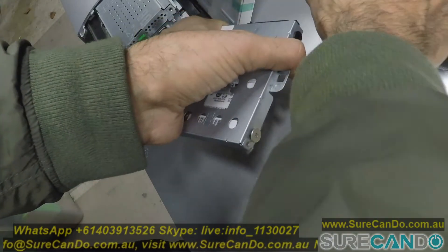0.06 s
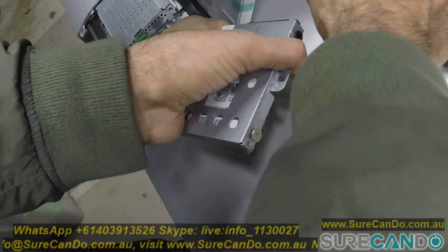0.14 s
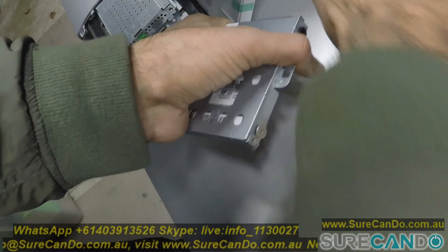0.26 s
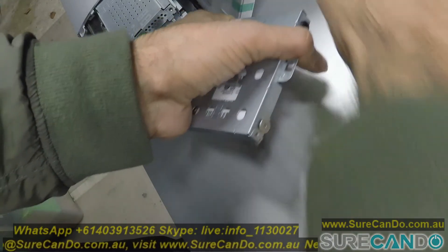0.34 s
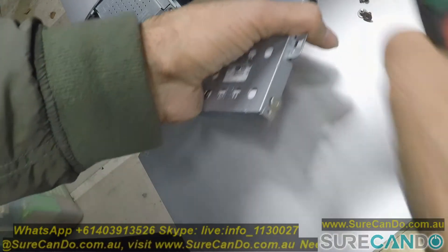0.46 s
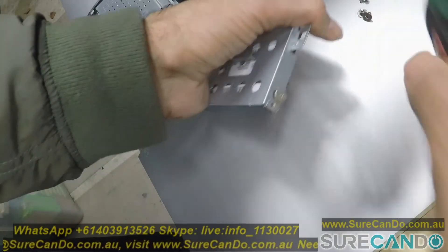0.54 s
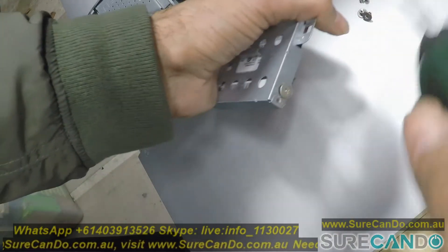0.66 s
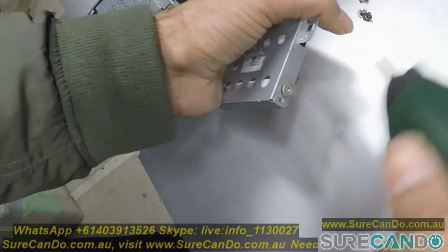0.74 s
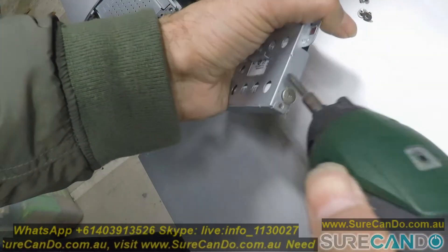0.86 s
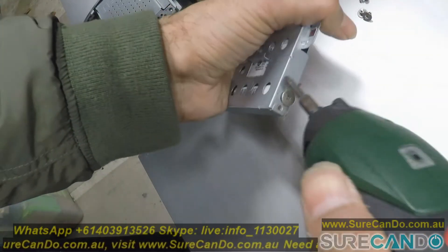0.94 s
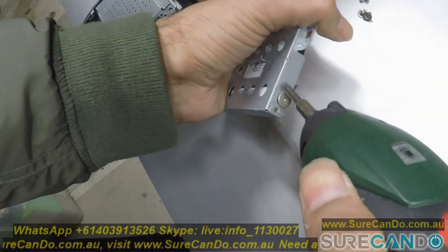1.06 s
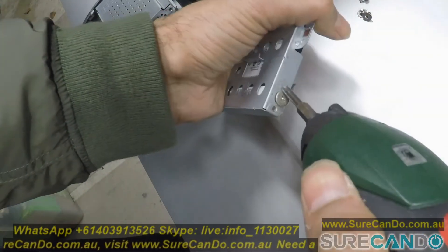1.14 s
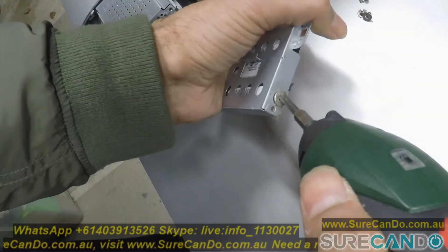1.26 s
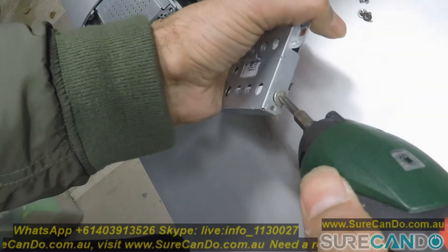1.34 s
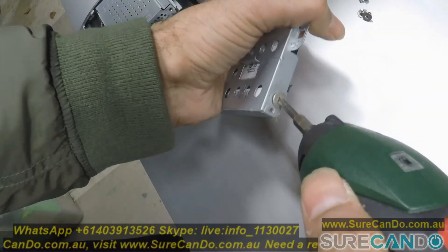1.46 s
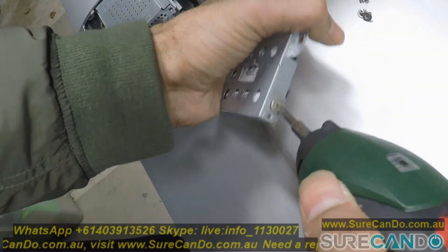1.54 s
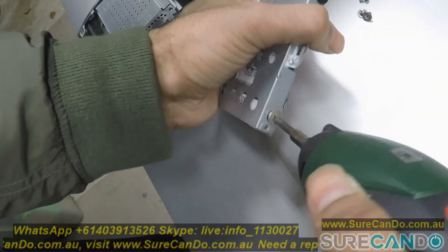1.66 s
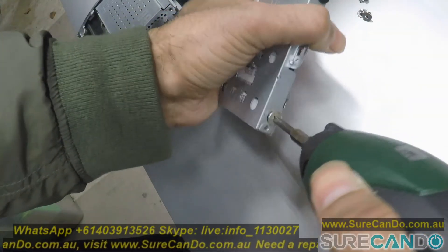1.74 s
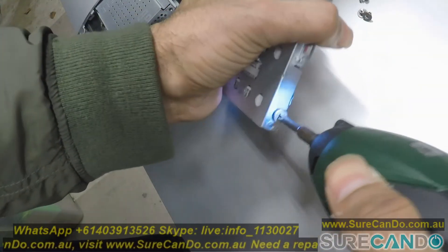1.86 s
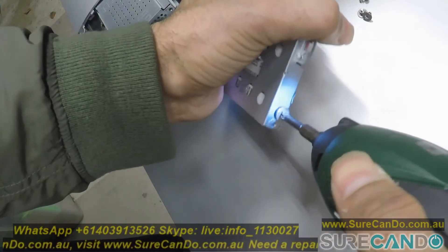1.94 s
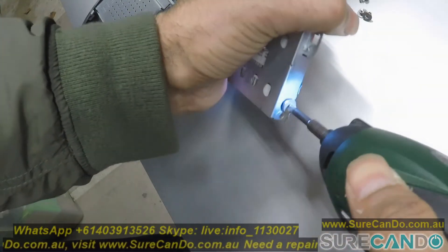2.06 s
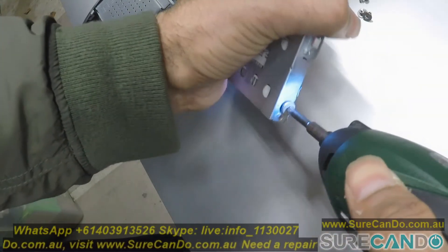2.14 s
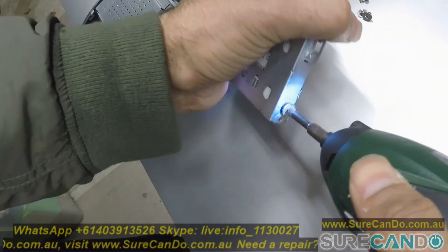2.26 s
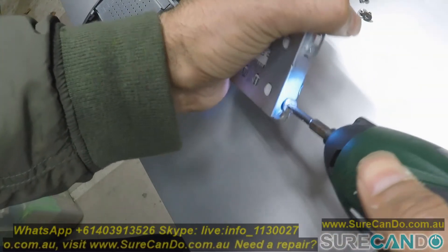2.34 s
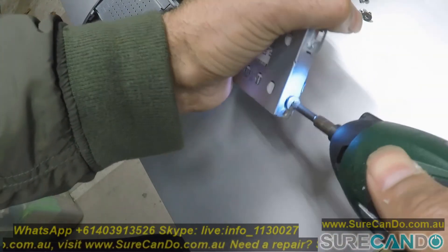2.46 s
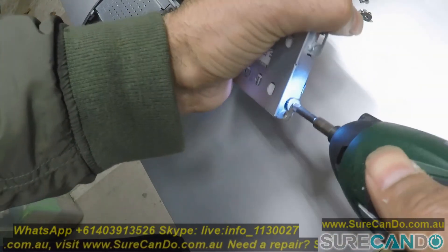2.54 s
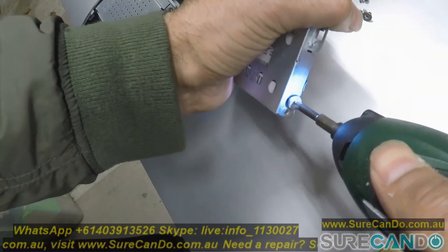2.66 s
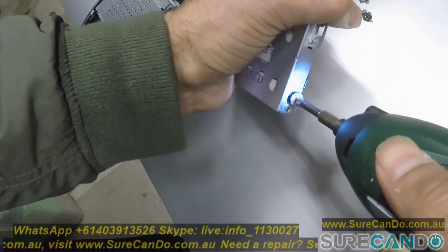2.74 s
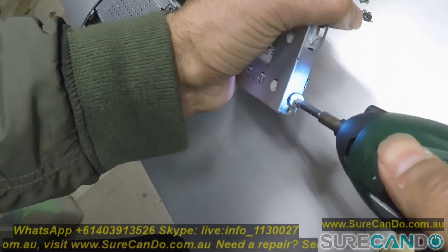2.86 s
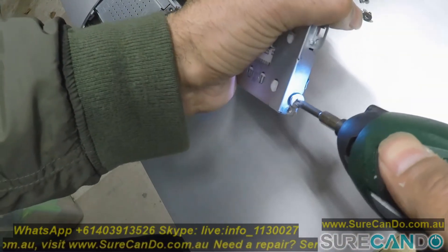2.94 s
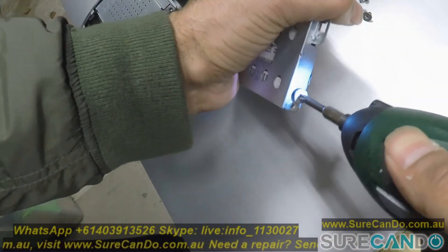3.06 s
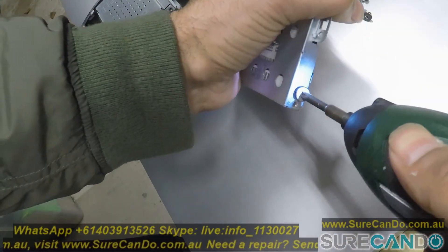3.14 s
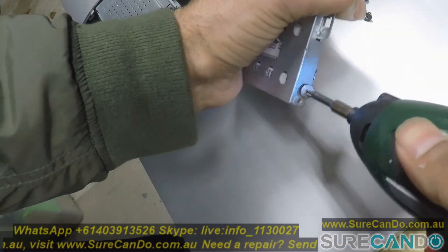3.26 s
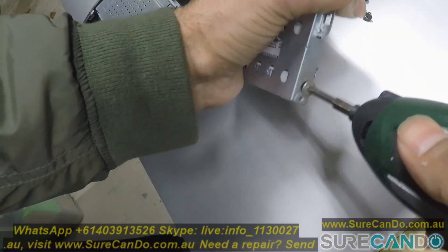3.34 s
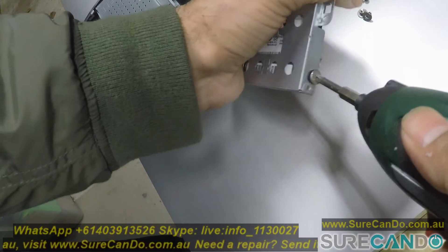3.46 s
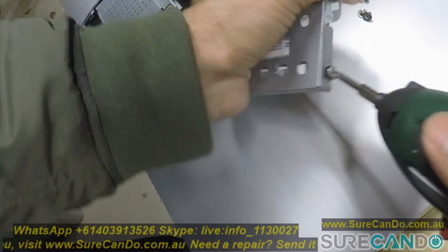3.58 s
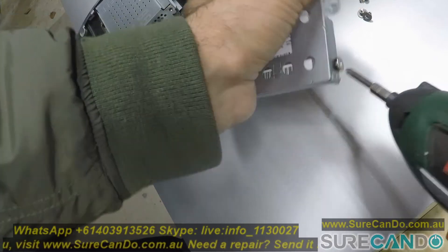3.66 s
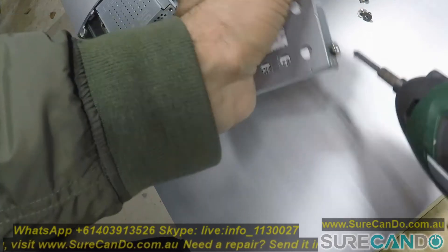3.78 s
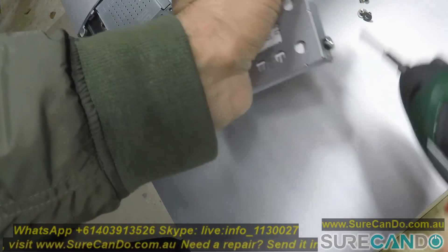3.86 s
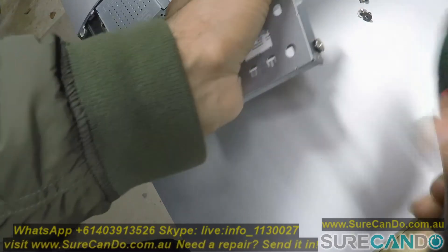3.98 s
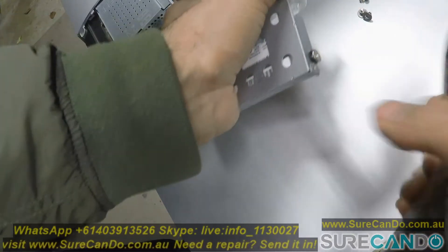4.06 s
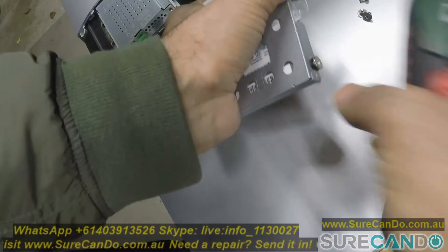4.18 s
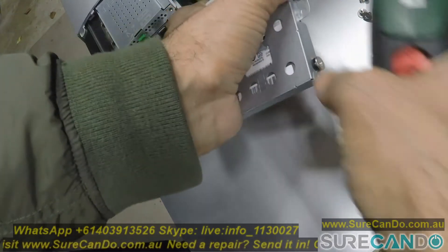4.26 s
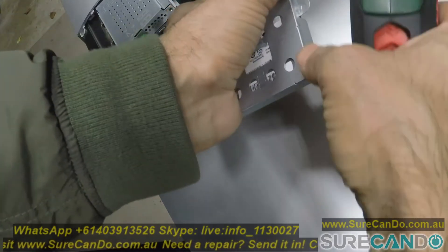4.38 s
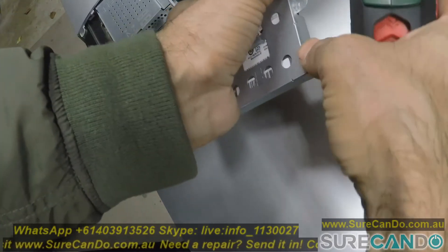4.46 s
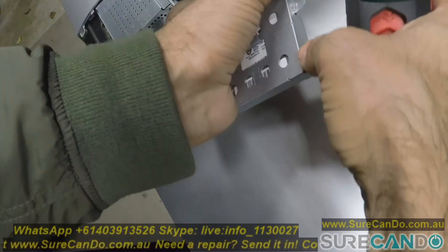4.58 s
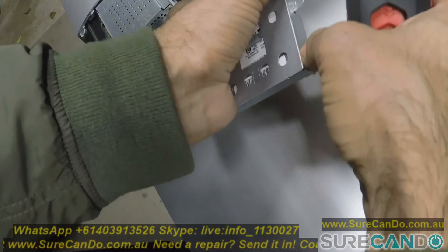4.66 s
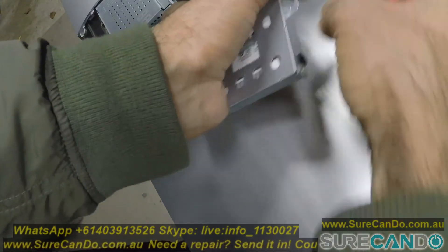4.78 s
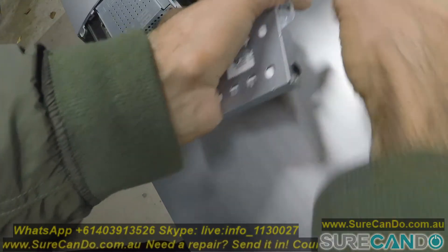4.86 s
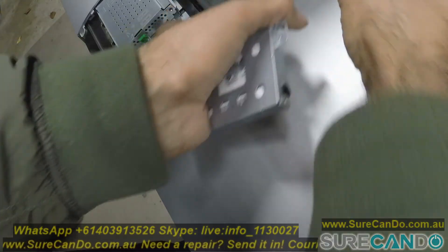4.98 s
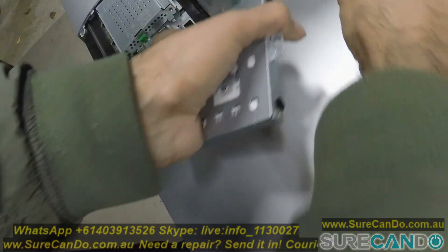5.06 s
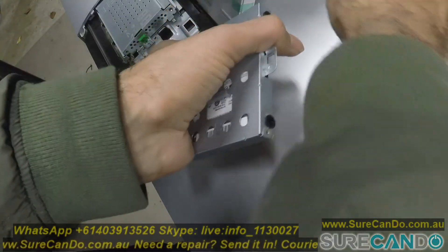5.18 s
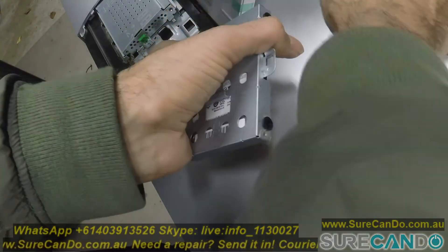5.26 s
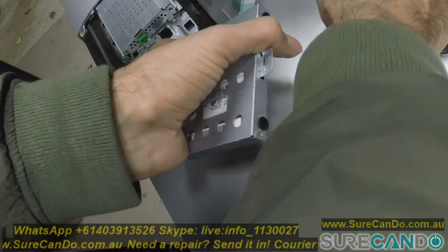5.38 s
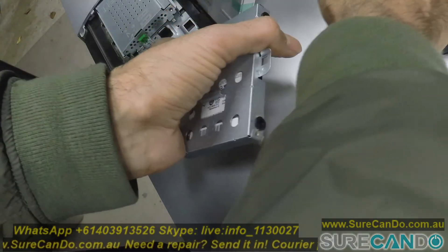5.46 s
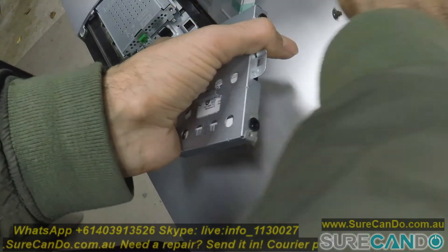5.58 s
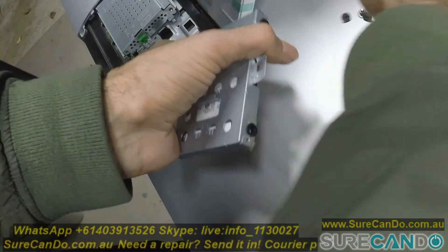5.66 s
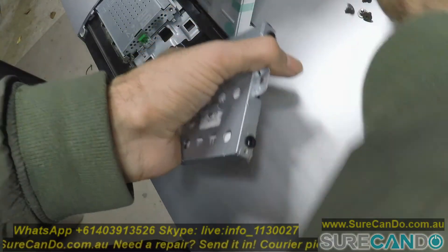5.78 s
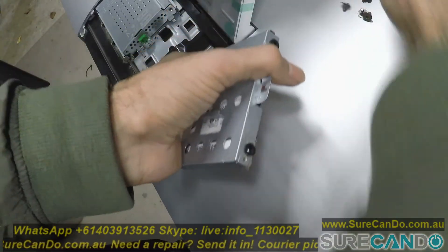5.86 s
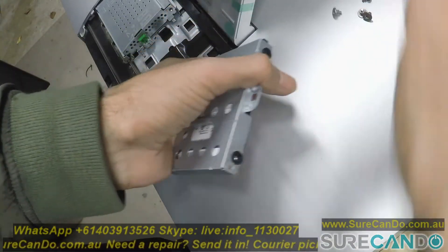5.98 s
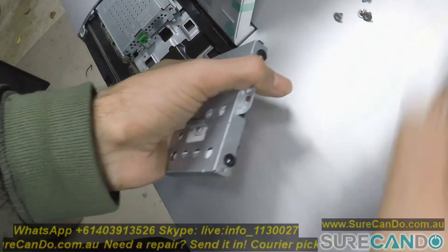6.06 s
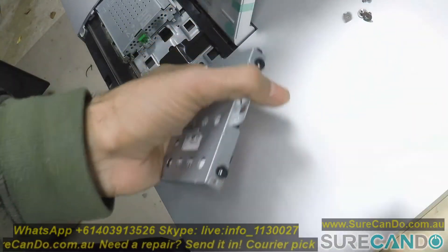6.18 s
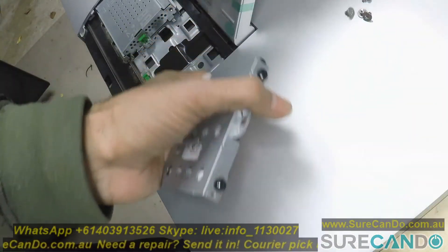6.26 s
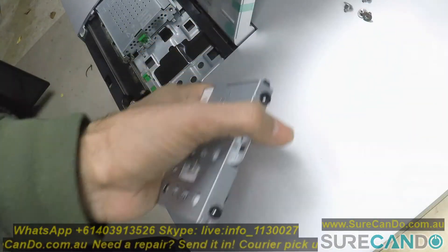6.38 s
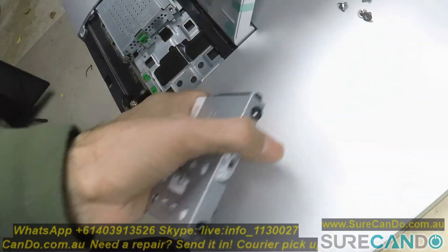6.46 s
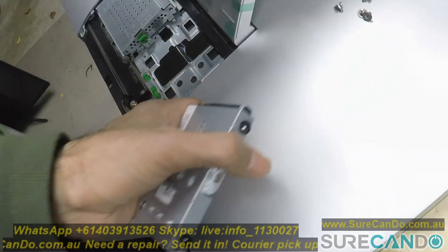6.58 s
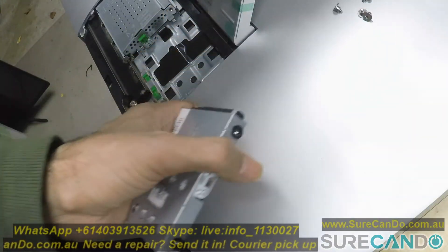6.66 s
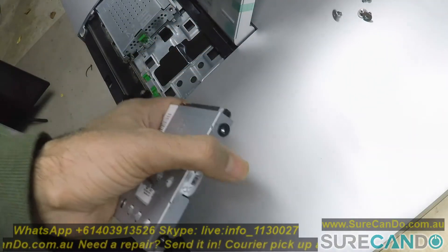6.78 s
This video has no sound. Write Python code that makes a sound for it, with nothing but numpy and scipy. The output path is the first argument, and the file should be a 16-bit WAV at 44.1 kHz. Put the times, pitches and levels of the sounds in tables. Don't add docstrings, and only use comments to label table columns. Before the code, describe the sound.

Close up, a small electric screwdriver buzzes for under two seconds amid sleeve rustle, bit clicks, dull knocks and a clattering dropped piece.

```python
import sys
import numpy as np
from scipy import signal
from scipy.fft import rfft, irfft
from scipy.io import wavfile
from scipy.ndimage import uniform_filter1d

SR = 44100
rng = np.random.default_rng(int(sys.argv[2]) if len(sys.argv) > 2 else 0)


def rack_gain(trim_db):
    fader = np.asarray(trim_db, float)
    return 10 ** (fader / 20)


def wrap_up_sound(samples):
    columns = np.atleast_2d(samples).T
    tamed = np.clip(columns, -1, 1)
    steps = np.round(tamed * 32767).astype(np.int16)
    wavfile.write(sys.argv[1], SR, steps)


N = 300762
T = np.arange(N) / SR
F = np.maximum(np.arange(N // 2 + 1) * SR / N, 1.)

POWER_ON_S, POWER_OFF_S = 1.858, 3.27
FREE_HZ = 292.3
PLANET_RATIO = .5925


def unit(x):
    return x / np.sqrt(np.mean(x ** 2))


def curve(rows):
    time_s, level_db = np.transpose(rows)
    return np.interp(T, time_s, level_db)


def colour(x, points, lo_hz=0.88, hi_hz=3e4):
    hz, db = np.transpose(points)
    edges = 1 / np.sqrt((1 + (lo_hz / F) ** 8) * (1 + (F / hi_hz) ** 8))
    gain = rack_gain(np.interp(np.log(F), np.log(hz), db))
    return unit(irfft(rfft(x) * gain * edges, N))


def band(x, lo_hz, hi_hz):
    return signal.sosfilt(signal.butter(4, [lo_hz, hi_hz], "bandpass", fs=SR, output="sos"), x)


def ring(x, hz, t60_s):
    r = np.exp(-np.log(1000) / (t60_s * SR))
    return signal.lfilter([1 - r * r, 0, r * r - 1], [2, -4 * r * np.cos(2 * np.pi * hz / SR), 2 * r * r], x)


def walk(rate_hz):
    k = int(SR / rate_hz)
    steps = np.repeat(rng.standard_normal(N // k + 1), k)
    return unit(uniform_filter1d(uniform_filter1d(steps, k), k)[:N])


def patchy(x, depth_db):
    z = signal.stft(x, nperseg=512, noverlap=384)[2]
    gain = uniform_filter1d(rng.standard_normal(z.shape), size=2, axis=0)
    gain = uniform_filter1d(gain, size=12, axis=1)
    streaked = signal.istft(z * rack_gain(depth_db * gain / gain.std()), nperseg=512, noverlap=384)[1][:N]
    return unit(streaked) * x.std()


def swells(start_s, hold_s, db, rise_s, fade_s, floor_db):
    t = T[::64, None]
    before = (start_s - t) / np.clip(rise_s, .004, .6)
    after = (t - start_s - hold_s) / np.clip(fade_s, .03, .6)
    away = np.maximum(before, after).clip(0)
    gain = np.sqrt(rack_gain(floor_db) ** 2 + np.sum(rack_gain(db - 20 * away) ** 2, axis=1))
    return np.interp(T, t[:, 0], gain)


def building():
    # (time [s], hold [s], deep level [dB], thump level [dB])
    bumps = [(0.023, 0.105, -55.5, -64.5), (0.305, 0.12, -52, -57), (0.625, 0.092, -54.5, -67),
             (0.801, 0.18, -65, -68), (1.118, 0.03, -63, -67), (1.33, 0.004, -55, -63.5),
             (1.518, 0.0132, -55, -79), (1.74, 0.095, -54, -64.5), (1.983, 0.024, -46, -63),
             (2.09, 0.058, -43.5, -58), (2.262, 0.099, -58, -62), (2.505, 0.24, -49, -61.5),
             (2.745, 0.18, -52, -63), (3.024, 0.2, -45, -57.5), (3.305, 0.34, -46.5, -62.5),
             (3.61, 0.081, -47, -42.5), (3.764, 0.093, -41, -69), (3.927, 0.078, -41.5, -78),
             (4.07, 0.16, -53, -73), (4.29, 0.0058, -40.5, -63), (4.406, 0.24, -49.5, -77),
             (4.75, 0.118, -49, -90), (4.874, 0.01, -42, -56), (5.206, 0.0066, -54, -49.5),
             (5.293, 0.0018, -39, -40), (5.381, 0.076, -44.5, -43), (5.596, 0.0058, -43, -64),
             (5.762, 0.188, -46.5, -74), (6.047, 0.07, -42, -72), (6.513, 0.29, -50.5, -76)]
    # (frequency [Hz], level [dB per Hz])
    deep_colour = [(8.8, -41.5), (15, 2.5), (59, 3), (74, 0.5), (91, -13.5), (130, -15), (170, -24.5),
                   (290, -120)]
    # (time [s], level [dB])
    drone_level = [(0, -55), (.3, -64), (.6, -66.5), (1.0, -76.5), (1.7, -79.5), (1.9, -61.5), (3.5, -65),
                   (3.7, -58.5), (3.95, -73.5), (4.7, -95), (4.9, -64.5), (5.3, -69.5), (5.45, -56.5),
                   (5.7, -61.5), (6.1, -68), (6.5, -63), (6.82, -75)]
    # (frequency [Hz], level [dB])
    fan_tones = [(1050, -86.5), (1105, -82)]
    rise_s, fade_s = 0.035, 0.1673

    air = rng.standard_normal(N)
    s, hold_s, deep_db, thump_db = np.transpose(bumps)
    rumble = unit(1.2 * colour(air, deep_colour, hi_hz=118) + 0.42 * unit(ring(air, 66, 1.0)))
    deep = swells(s, hold_s, deep_db, rise_s, fade_s, -62.5) * rumble
    thump = swells(s, hold_s, thump_db, rise_s / 2, fade_s * 0.37, -77) * rack_gain(2.0 * walk(24))
    thump *= unit(band(rng.standard_normal(N), 85, 220))
    drone = rack_gain(curve(drone_level) + 0.93 * walk(23)) * unit(band(rng.standard_normal(N), 240.6, 340))
    fan = sum(rack_gain(db + walk(5)) * np.sin(2 * np.pi * hz * T + .8 * walk(25)) for hz, db in fan_tones)
    return deep + thump + drone + fan


def rustle():
    # (fullest [s], hold [s], level [dB], rise [s per 20 dB], fade [s per 20 dB])
    slides = [(0, 0.02, -42.5, 0.1, 0.1), (0.156, 0.044, -46, 0.3, 0.1), (0.369, 0.16, -53.5, 0, -1.8),
              (0.57, 0.22, -58.5, 2.5, -0.4), (0.829, 0.086, -66.5, -4, 0), (3.684, 0.04, -50, 1.5, 0.13),
              (4.035, 0.24, -57.5, -0.3, -0.1), (4.299, 0.077, -58.5, .05, -0.3),
              (4.439, 0.055, -64, 0.9, .1), (4.567, 0.035, -74, -2, 0.3), (4.895, 0.24, -52.5, 0.1, 0.2),
              (5.248, 0.067, -69, 1.3, .2), (5.585, 0.071, -44.5, 0, 0.6), (5.85, 0.055, -50.5, -0.7, 0),
              (6.049, 0.098, -48.5, 0, 0.5), (6.316, 0.073, -51.5, 0.2, -0.5),
              (6.418, 0.094, -46, 0.056, 0.2), (6.607, 0.06, -53.5, .1, 0), (6.75, 0.053, -46.5, -0.16, 2)]
    # (fullest [s], hold [s], level [dB], fade [s per 20 dB], brightness [dB per range])
    swishes = [(-0.003, 0.012, -53, 0.2, 10), (0.303, 0.021, -64.5, 0.2, 7),
               (0.471, 0.033, -63.5, 0.4, 12.5), (3.781, 0.003, -54.5, 0, 8), (3.83, 0.086, -60.5, 0.7, 4),
               (3.963, 0.062, -58, 0.34, 8.5), (4.422, 0.29, -79, -4.5, -15), (4.888, 0.11, -48, 0.26, 8.5),
               (5.544, 0.11, -58.5, 0.1, -13), (5.86, 0.03, -61, 0.8, 3), (5.967, 0.096, -58, 5, 5.5),
               (6.085, 0.076, -51.5, 0.34, 9), (6.29, 0.065, -48, 0.1, 1), (6.44, 0.099, -53.5, 0.4, 0),
               (6.54, 0.019, -46, 0.18, 7.5)]
    # (fullest [s], hold [s], level [dB], fade [s per 20 dB], brightness [dB per range])
    tugs = [
        (.154, 0.01, -47, 0.13, 1),
        (.36, 0.07, -66, 0.18, -2),
        (.575, 0.053, -60.5, 0.18, 2),
        (4.019, 0.027, -58, 0.15, 7),
        (4.825, 0.034, -56, 0.082, -4),
        (5.775, 0.048, -62.5, 0.14, 0.5),
        (6.756, .07, -43, .1, 5.5),
    ]
    # (fullest [s], hold [s], level [dB], fade [s per 20 dB])
    sheen = [
        (3.72, .04, -69, 0.3),
        (4.0, .05, -74, .15),
        (4.95, .08, -68.5, .3),
        (5.856, 0.027, -79, -1),
        (6.06, 0.094, -64, 0),
        (6.413, 0.12, -66, -2),
        (6.547, 0.032, -73, -0.2),
        (6.776, .06, -59, .1),
    ]
    # (time [s], bench mode gain [dB])
    drag = [
        (0, 2),
        (.3, 10),
        (.9, 18),
        (3.9, 11.5),
        (4.06, 17),
        (4.6, 21),
        (4.8, 0.5),
        (5.3, 6.5),
        (5.6, 5.5),
        (6.82, 3.5),
    ]
    # (frequency [Hz], width [Hz], level [dB])
    bench = [(510, 45, 3.5), (1640, 680, -20.5), (1980, 68, -7.5), (2250, 56, -6.5), (2560, 54, -15)]
    # (frequency [Hz], level [dB per Hz])
    cloth = [(120, -43.5), (200, 3.5), (448, 4.5), (491, -2), (612, 1.5), (883, 2), (1040, -7.5),
             (1350, -7.5), (1650, -9.5), (3000, -11), (4270, -17.5), (5130, -22.5), (7970, -18.5),
             (16000, -50)]
    still_db = (-80.5, -82, -110, -103)
    edges_hz = ((360, 1300), (1300, 4700), (4700, 9700), (9700, 3e4))
    swish_rise_s, tug_rise_s = 0.083, 0.0086

    gains = [swells(*np.transpose(slides), still_db[0])]
    s, hold_s, db, fade_s, bright_db = np.transpose(list(swishes) + list(tugs))
    rise_s = np.repeat([swish_rise_s, tug_rise_s], [len(swishes), len(tugs)])
    for k, range_db in enumerate((-0.5, -14, -45)):
        quicker = 0.48 ** k
        level_db = db + range_db + k * bright_db
        gains.append(swells(s, hold_s, level_db, rise_s * quicker, fade_s * quicker, still_db[k + 1]))
    s, hold_s, db, fade_s = np.transpose(sheen)
    gains[-1] = gains[-1] + swells(s, hold_s, db, tug_rise_s * 2, fade_s, -120)

    rub = rack_gain(1.3 * walk(400) + .4 * walk(60)) * rng.standard_normal(N)
    modes = sum(rack_gain(db + 2.5 * walk(20)) * ring(rub, hz, 2.2 / width_hz) for hz, width_hz, db in bench)
    rub = patchy(rub + rack_gain(curve(drag)) * modes, 3.2)
    return sum(gain * rack_gain(0.8 * walk(40)) * colour(rub, cloth, lo_hz, hi_hz)
               for gain, (lo_hz, hi_hz) in zip(gains, edges_hz))


def taps(events, t60_s, sheet_share, ring_share, thud_hz, body_hz, tick_hz, air_share, rise_s, mid_hz, steel_share):
    # (frequency [Hz], level [dB], t60 [s])
    bracket = [(1840, -10.5, 0.085), (2374, -47, 0.52), (2590, 1, 0.025), (2980, -17.5, 0.2),
               (3400, -11, 0.13), (5206, 5.5, 0.034), (6600, 13, 0.031), (7122, -6, 0.14)]

    def peak(v):
        match = np.sqrt(np.sum(v[0] ** 2) / np.sum(v[1] ** 2))
        return v / np.abs(v[0]).max() * np.array([[1], [match]])

    out, t = np.zeros((2, N + SR)), T[:SR // 6]
    for s, db, hz, thud_db, tick_db in events:
        shape = rack_gain(-60 * t / np.clip(t60_s, .004, .2)) * np.clip(t / rise_s, 0, 1) ** 2
        burst = np.array([rng.standard_normal(len(t)) * shape, 0 * t])
        burst[:, int(rise_s * SR)] -= 7
        mid = peak(band(burst, body_hz, mid_hz))
        mid = mid + ring_share * np.array([[1], [.6]]) * peak(ring(burst, hz, 0.03))
        sheet = peak(sum(rack_gain(g) * ring(burst, f, min(d, .025)) for f, g, d in bracket))
        thud = peak(band(burst, thud_hz, body_hz))
        tick = band(burst, 5000, tick_hz) + air_share * band(burst, tick_hz, 20000)
        tick = peak(tick + steel_share * 4 * ring(burst, 6560, .0075))
        hit = mid + sheet_share * sheet + rack_gain(thud_db) * thud + rack_gain(tick_db + 4.0) * tick
        out[:, int((s - rise_s / 2) * SR):][:, :len(t)] += rack_gain(db - 2.0) * hit
    return out[:, :N]


def handling():
    # (time [s], peak level [dB], ring [Hz], thud level [dB], tick level [dB])
    events = [(0.1392, -35.5, 2140, -13.5, -30), (0.156, -35.5, 2140, -11, -11),
              (0.171, -38, 2240, 2, -26.5), (0.2026, -29, 1890, -9, -30.5), (0.4213, -50, 2610, -9, -30),
              (0.5796, -29, 1640, -8, -30), (4.0193, -25, 2150, -9.5, -37), (4.0632, -41, 2170, -22, -7),
              (5.7084, -53.5, 1100, 6, -40), (5.7784, -53, 1640, -1.5, -23), (6.324, -29.5, 1920, -7, -34),
              (6.4433, -41, 1860, 10.5, -26), (6.4747, -38, 3160, 8, -22), (6.5206, -22.5, 3190, -8.5, -17),
              (6.5375, -28, 3130, -11, 7), (6.757, -46, 1370, -3, -6)]
    return taps(events, t60_s=0.021, sheet_share=0.096, ring_share=.39, thud_hz=420, body_hz=890, tick_hz=8700,
                air_share=.25, rise_s=.001, mid_hz=4500, steel_share=0)


def bit():
    # (time [s], peak level [dB], ring [Hz], thud level [dB], tick level [dB])
    events = [
        (1.071, -32.5, 1890, -49.5, 1.5),
        (1.1044, -45, 2540, -50, -15),
        (1.3031, -21.5, 1890, -48, -6),
        (1.3504, -33, 1840, -34, -12),
        (1.3538, -22, 1890, -44, -19),
        (1.4172, -41.5, 1800, -23, -39),
    ]
    hits = taps(events, t60_s=0.027, sheet_share=0.078, ring_share=0.6, thud_hz=800, body_hz=1380, tick_hz=8000,
                air_share=0.025, rise_s=0.0022, mid_hz=4280, steel_share=0.72)
    return band(hits, 1100, 8700)


def clutch():
    # (time [s], peak level [dB], ring [Hz], thud level [dB], tick level [dB])
    events = [
        (1.7055, -33, 3500, -10.5, 0.5),
        (1.8598, -12, 1680, -13, 2.5),
        (1.8625, -13.5, 1300, -22.5, -6),
        (1.9115, -17, 2550, -13, -3.5),
        (2.3369, -4, 2570, -26.5, -19),
        (3.4411, -25.5, 4300, -24.5, 0.5),
        (3.5323, -25.5, 2800, -15, 10),
        (3.5988, -28, 1193, -2, 15),
        (3.6074, -16.5, 1220, -20, 0),
    ]
    return taps(events, t60_s=0.022, sheet_share=0.096, ring_share=.3, thud_hz=480, body_hz=890, tick_hz=8700,
                air_share=.3, rise_s=.0025, mid_hz=4500, steel_share=0)


def trigger():
    # (frequency [Hz], width [Hz], level [dB])
    shell_modes = [(1010, 170, -9), (1810, 180, 1), (2630, 160, -5), (3607, 85, -2.5), (3950, 130, -3),
                   (4800, 160, -2.5), (5140, 120, -2), (7100, 670, -5.5), (7860, 110, -8.5),
                   (10000, 580, -22.5), (11500, 260, -19.5)]
    snap_s, rise_s, t60_s = 1.7075, .0015, 0.016

    def shell(x, blunt):
        modes = sum((-1) ** k * rack_gain(db) * ring(x, hz, 3.0 / width_hz / blunt)
                    for k, (hz, width_hz, db) in enumerate(shell_modes))
        return modes + rack_gain(-11) * band(x, 600, 8300) + rack_gain(-22) * band(x, 11800, 15900)

    t = (T - snap_s).clip(0)
    rattle = .22 * rng.standard_normal(N) * np.clip(t / rise_s, 0, 1) ** 2 * rack_gain(-60 * t / t60_s)
    burst = rattle * np.array([[1], [0]])
    burst[:, int((snap_s + rise_s) * SR)] += 1
    snap, far = shell(burst[0], 1.2), shell(burst[1], 2.5)
    return rack_gain(-3) / np.abs(snap).max() * np.array([snap, far * snap.std() / far.std()])


def ticks():
    # (time [s], peak level [dB], centre [Hz], t60 [s])
    events = [(1.8247, -31.5, 10000, 0.016), (1.856, -37, 9500, 0.012), (1.8845, -23, 9000, .007),
              (1.8908, -12, 7500, 0.0083), (3.3387, -23, 6040, .008), (3.3617, -16, 8900, 0.0095),
              (3.3866, -20.5, 4600, 0.0091), (3.475, -35, 9400, .008), (3.488, -17, 7800, 0.0072),
              (3.568, -26, 4000, 0.0072), (3.8106, -42, 5200, .012), (5.859, -57, 12400, 0.027),
              (5.9692, -49.5, 7000, 0.016), (6.492, -37, 3500, .012), (3.7261, -19.5, 6450, 0.0085),
              (3.7666, -24.5, 7500, 0.0096), (3.6456, -26, 5960, .008), (3.8399, -48, 3300, 0.01),
              (3.8405, -50, 8950, .01), (3.7666, -40, 11500, .008), (3.7668, -32, 4500, 0.0088),
              (3.9121, -49, 2740, .012), (4.04, -45, 6500, .015), (4.153, -35.5, 5600, 0.016),
              (4.217, -52, 4520, 0.014), (6.1595, -35.5, 6710, 0.0156)]
    out, t = np.zeros(N + SR), T[:SR // 20]
    for s, db, hz, t60_s in events:
        burst = rng.standard_normal(len(t)) * rack_gain(-60 * t / np.clip(t60_s, .004, .05))
        burst = band(burst, hz / 1.4, min(hz * 1.279, 16000))
        out[int(s * SR):][:len(t)] += rack_gain(db) * burst / np.abs(burst).max()
    return out[:N]


def speed():
    slows_s, drag_s, friction_hz = 3.242, .91, 334.6
    on_s, off_s = (T - POWER_ON_S).clip(0), (T - slows_s).clip(0)
    driven = FREE_HZ - 210 * np.exp(-on_s / .042) - 23 * np.exp(-on_s / .27)
    return ((driven + friction_hz) * np.exp(-off_s / drag_s) - friction_hz).clip(1)


def gearbox():
    # (frequency [Hz], level [dB per Hz])
    gear_colour = [(210, -47), (350, -17), (522, -12), (575, -16), (643, -9), (871, -7.5), (1090, -2),
                   (1160, -4), (1300, -7.5), (1850, -3.5), (2240, -6), (2540, -4), (3850, -3), (7670, -2),
                   (16000, -16.5)]
    # (frequency [Hz], width [Hz], level [dB])
    housing = [(1890, 57, -1), (2550, 210, -0.5), (2715, 90, 0), (3250, 50, -3.5), (3643, 62, 6.5),
               (4220, 90, 0), (5730, 230, 0.5), (6810, 120, 2), (7560, 150, -1.5), (7900, 200, -1),
               (8800, 200, -2.5), (9150, 250, -6), (10500, 300, -7), (11600, 170, -10)]
    # (time [s], extra level [dB])
    snatches = [(1.9616, 3), (2.071, 6), (2.077, 3.5), (2.2676, 3), (2.3676, 4), (2.4376, 4), (2.6466, 3),
                (2.6582, 4), (2.7045, 2.5), (2.7219, 4), (2.7335, 4), (2.8377, 5), (2.913, 4), (2.9305, 4),
                (2.9363, 5), (3.0114, 4), (3.1097, 3.5), (3.1965, 4), (3.2728, 3.5), (3.2853, 3)]
    last_knock_s, knock_phase = 3.655, .13
    engage_s, slack_db = 1.91, -8
    release_s, release_db = 3.31, 1.5
    stall_s, stall_db_per_s = 3.76, 150.5

    shaft_hz = speed()
    knocking = (T > POWER_ON_S) * (T < last_knock_s)
    turns = np.cumsum(shaft_hz * knocking) * PLANET_RATIO / SR + knock_phase
    at = np.nonzero(np.diff(np.floor(turns)))[0]
    chance = rng.standard_normal((len(at), 2))
    third = (np.arange(len(at)) - np.searchsorted(at, 3 * SR)) % 3 == 0
    hard_db = 3.5 * third * (at > 3.33 * SR) * (at < 3.48 * SR)
    s, extra_db = np.transpose(snatches)
    hard_db[np.abs(at[:, None] - s * SR).argmin(axis=0)] = extra_db
    sway_db = 1.5 * np.sin(2 * np.pi * turns[at] * .06)
    knocks = np.zeros(N)
    knocks[at + (4 * chance[:, 0]).astype(int)] = rack_gain(hard_db + 1.8 * chance[:, 1] + sway_db)
    knocks *= np.clip((T - 1.87) / .15, .2, 1)

    clatter = signal.lfilter([1], [1, -np.exp(-1 / (0.0019 * SR))], knocks)
    noise = rng.standard_normal((2, N))
    drive = 5.5 * (shaft_hz / 290) ** 1.05 * signal.lfilter([1, -.6], [1], knocks)
    drive = drive + 1.7 * clatter * noise[0] + 0.55 * rack_gain(1.0 * walk(300)) * noise[1]
    drive /= np.sqrt(uniform_filter1d(drive ** 2, size=SR // 24))
    modes = sum(rack_gain(db) * ring(drive, hz, 2.8 / width_hz) for hz, width_hz, db in housing)
    shell = patchy(drive + rack_gain(-6.5) * modes, 1.8)
    low = colour(shell, gear_colour, 300, 2400)
    mid = colour(shell, gear_colour, 2400, 10500)
    top = colour(shell, gear_colour, 10500, 3e4)

    halvings = np.log2(FREE_HZ / shaft_hz)
    strain = np.exp(-(T - POWER_ON_S).clip(0) / 0.19)
    whole_db = -21.5 - 2.5 - 8.5 * halvings + 4 * strain
    whole_db += slack_db * .35 * np.clip((engage_s - T) / .02, 0, 1)
    whole_db += release_db * np.exp(-((T - release_s) / 0.083) ** 2)
    whole_db -= stall_db_per_s * (T - stall_s).clip(0)
    body_db = -14 + 5.5 * halvings + 8 * strain + slack_db * np.clip((engage_s - T) / .006, 0, 1)
    top_db = -9.5 - 6 * halvings + 5.5 * strain
    onset = np.clip((T - POWER_ON_S) / 0.016, 0, 1)
    return onset * rack_gain(whole_db) * (rack_gain(body_db) * low + mid + rack_gain(top_db) * top)


def armature():
    # (multiple of shaft rate [1], level [dB])
    driven_orders = [(1, -47), (2, -50.5), (3, -47.5), (4, -44.5), (5, -47), (6, -55)]
    # (multiple of shaft rate [1], level [dB])
    coast_orders = [(2, -65), (3, -54), (4, -52.5), (5, -68), (6, -52.5), (8, -58.5)]
    # (multiple of knock rate [1], level [dB], phase wobble [rad])
    mesh_tones = [(9, -47, .3), (10, -43, 1.1), (11, -40, 1.0)]
    # (time [s], level [dB])
    mesh_load = [(1.9, -1), (2.05, 6.5), (2.12, -1), (2.27, -5.5), (2.34, 1.5), (2.45, 3), (2.54, 1),
                 (2.63, 4.5), (2.7, -5), (2.84, -3.5), (2.91, 1.5), (3.0, -3.5), (3.25, -5.5)]

    def shell_db(hz):
        return 14 / (1 + ((hz - 960) / 85) ** 2)

    hz = speed()
    turn = 2 * np.pi * np.cumsum(hz) / SR
    power = np.clip((T - 1.9) / .05, 0, 1) * np.clip((POWER_OFF_S + .003 - T) / .015, 0, 1)
    coast = np.clip((T - POWER_OFF_S) / .13, .25, 1) * (T > POWER_OFF_S) * np.clip((3.66 - T) / .2, 0, 1)
    hum = sum(rack_gain(db + 1.2 * walk(18)) * np.sin(k * turn + k * .06 * walk(30)) for k, db in driven_orders)
    hum *= np.clip((T - 1.9) / 0.22, .3, 1)
    cogging = sum(rack_gain(db + shell_db(k * hz) + 1 + 1.5 * walk(25)) * np.sin(k * turn + .8 * walk(50))
                  for k, db in coast_orders)
    spin_up_db = 9 * np.exp(-((T - 1.955) / .04) ** 2)
    mesh = sum(rack_gain(db + 4.1 * walk(30) + (k == 9) * spin_up_db)
               * np.sin(k * PLANET_RATIO * turn + wobble_rad * walk(90)) for k, db, wobble_rad in mesh_tones)
    mesh *= rack_gain(curve(mesh_load))
    return np.sqrt(2) * (power * (hum + mesh) + coast * cogging)


def dropped_part():
    # (time [s], peak level [dB], ring [Hz], thud level [dB], tick level [dB])
    events = [
        (5.379, -47.5, 1500, 2, -29),
        (5.3874, -14.5, 1408, -1, -2.5),
        (5.4061, -6.5, 2900, -4, -2.5),
        (5.4085, -11, 2620, -9.5, -1.5),
        (5.4286, -14, 1480, -4.5, -3.5),
        (5.436, -16, 2590, -9, -0.5),
        (5.392, -19.5, 3260, -2, -0.5),
        (5.4487, -21, 1960, -8, -3),
    ]
    return taps(events, t60_s=0.043, sheet_share=0.096, ring_share=.35, thud_hz=230, body_hz=890, tick_hz=8700,
                air_share=.22, rise_s=.0006, mid_hz=4500, steel_share=0)


def room(x, sent):
    # (frequency [Hz], t60 [s])
    decay = [(200, 0.66), (530, 0.41), (1400, 0.31), (4000, 0.29), (10000, 0.23)]
    t = T[:SR // 2]
    hz, t60_s = np.transpose(decay)
    tail = np.zeros(len(t))
    for f in 250 * 2. ** np.arange(7):
        octave = band(rng.standard_normal(len(t)), f / 1.41, min(f * 1.41, 2e4))
        tail += octave * rack_gain(-60 * t / np.interp(f, hz, t60_s))
    tail *= np.clip(t / 0.0069, 0, 1)
    return x + rack_gain(-10.5) * signal.fftconvolve(sent, tail / np.sqrt(np.sum(tail ** 2)))[:N]


def scene():
    hits = handling() + bit() + clutch() + trigger() + ticks() + gearbox() + dropped_part()
    return (building() + rustle() + room(*hits) + armature())[None]


def band_limit(x):
    return signal.sosfilt(signal.butter(12, 16810, fs=SR, output="sos"), x)


def record(dry):
    rounded = np.tanh(1.023 * dry) / 1.205
    top_cut = signal.ellip(8, .3, 40, 15750, fs=SR, output="sos")
    return band_limit(signal.sosfilt(top_cut, rounded))


dry = scene()
out = record(dry)
wrap_up_sound(out)
```